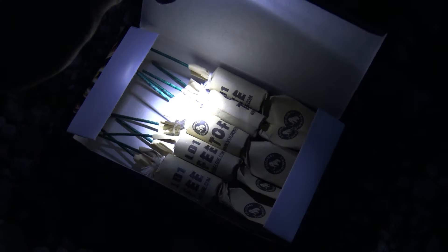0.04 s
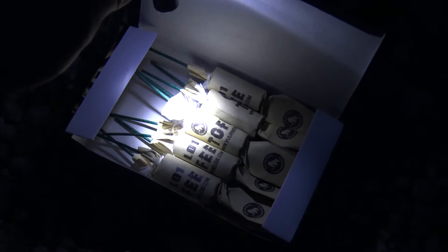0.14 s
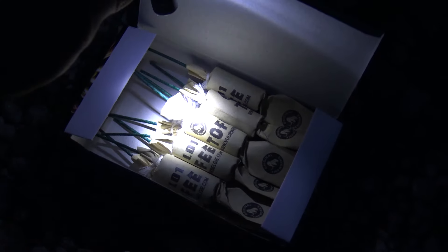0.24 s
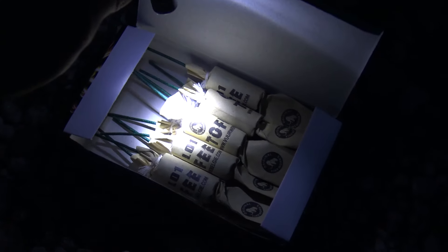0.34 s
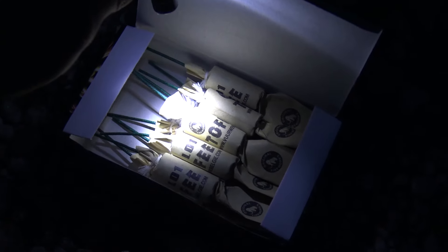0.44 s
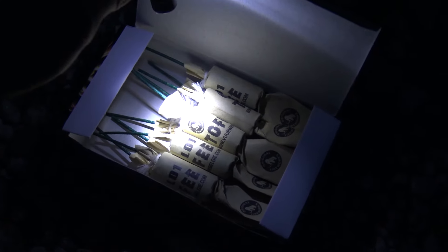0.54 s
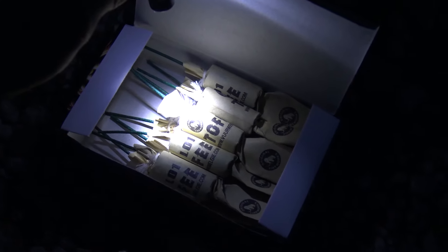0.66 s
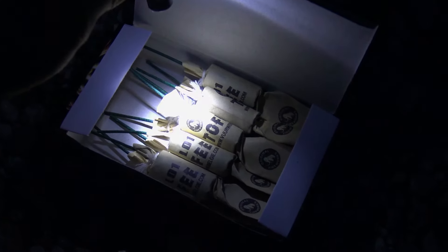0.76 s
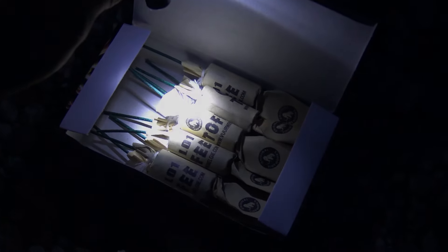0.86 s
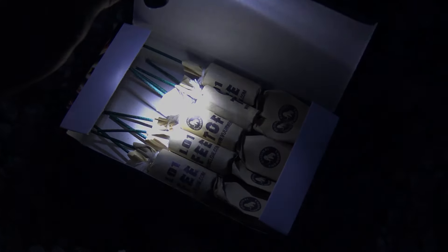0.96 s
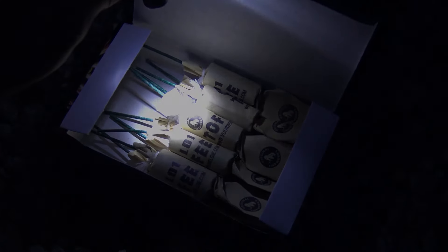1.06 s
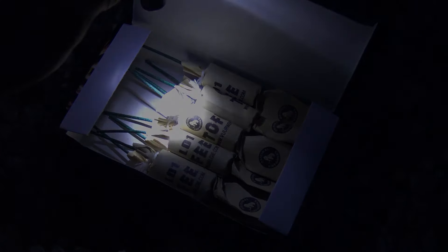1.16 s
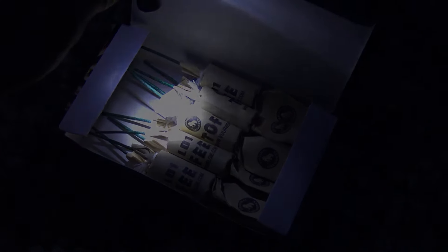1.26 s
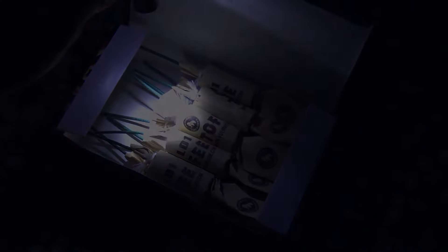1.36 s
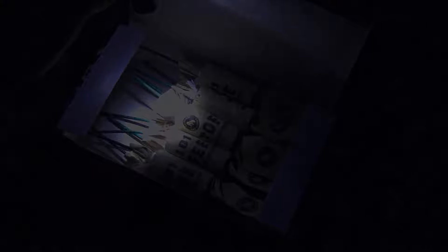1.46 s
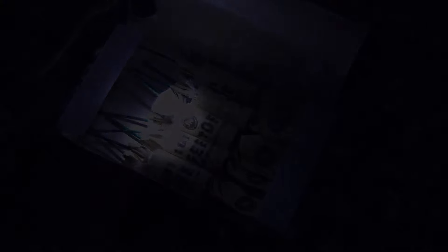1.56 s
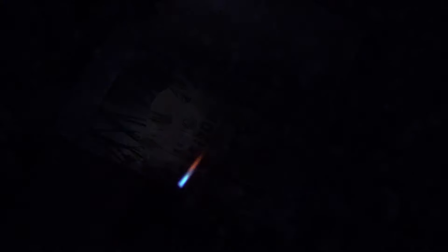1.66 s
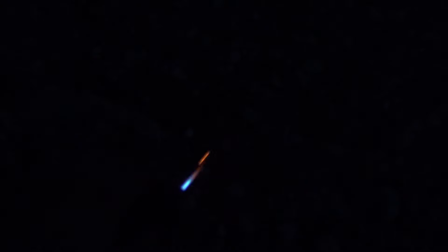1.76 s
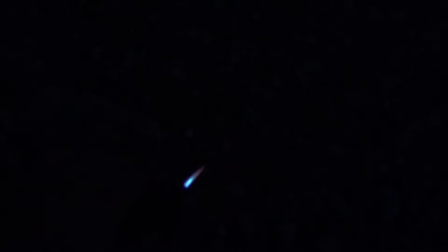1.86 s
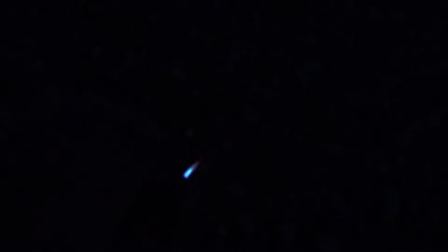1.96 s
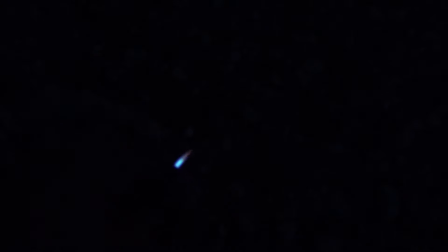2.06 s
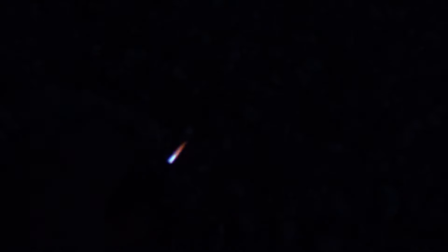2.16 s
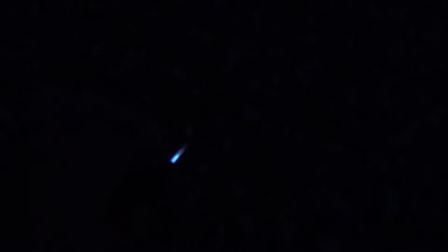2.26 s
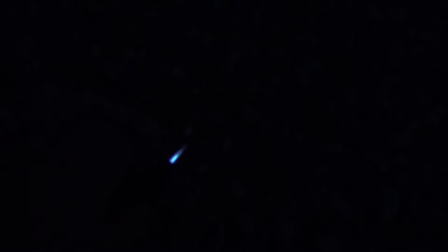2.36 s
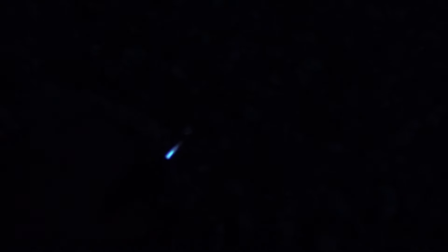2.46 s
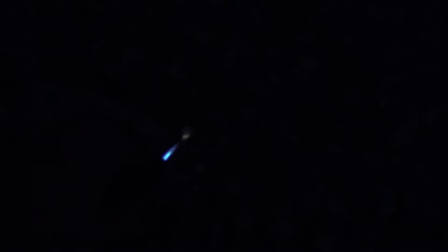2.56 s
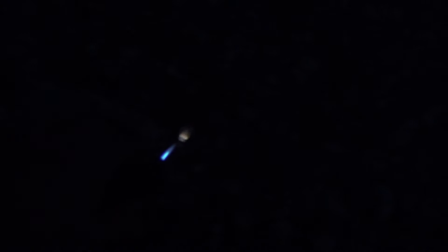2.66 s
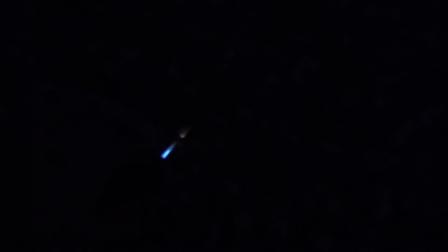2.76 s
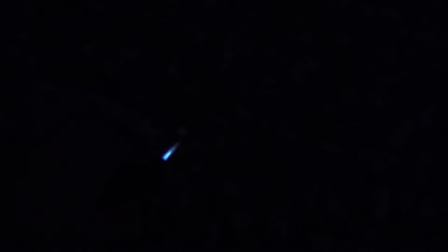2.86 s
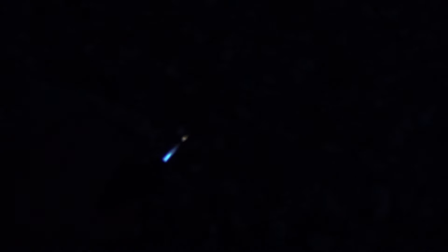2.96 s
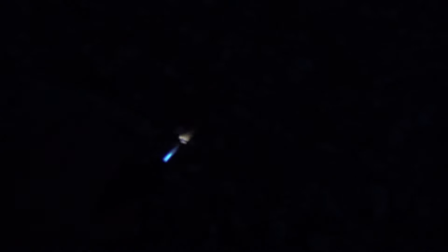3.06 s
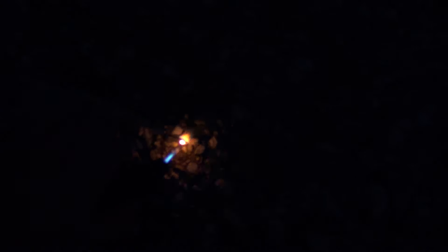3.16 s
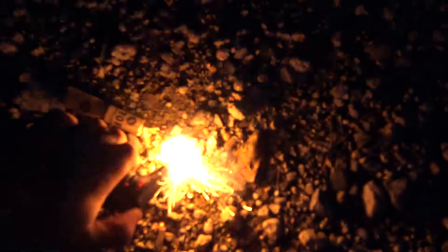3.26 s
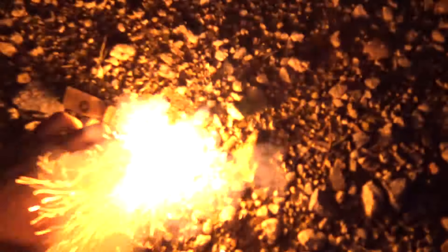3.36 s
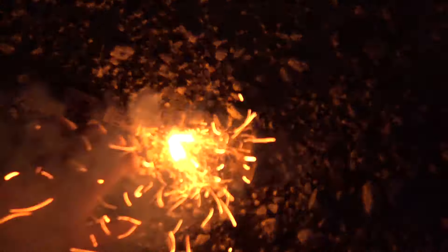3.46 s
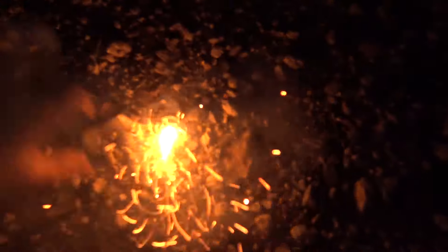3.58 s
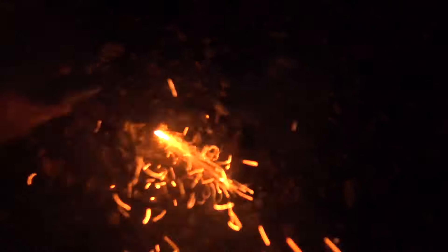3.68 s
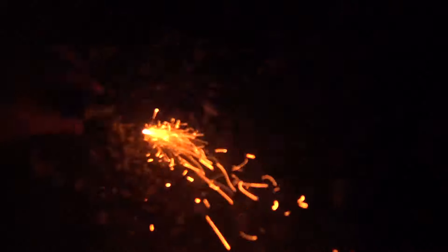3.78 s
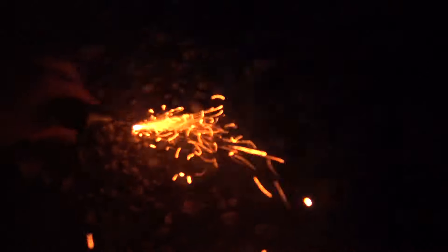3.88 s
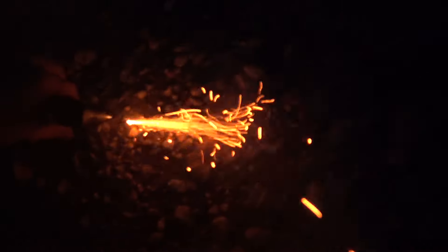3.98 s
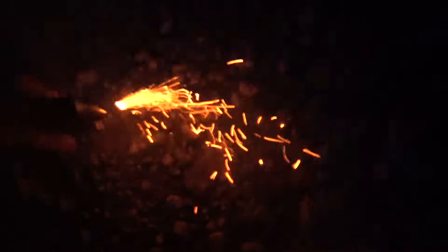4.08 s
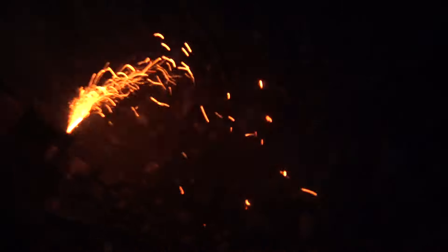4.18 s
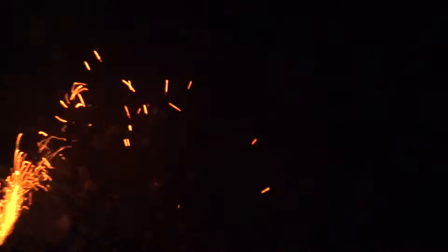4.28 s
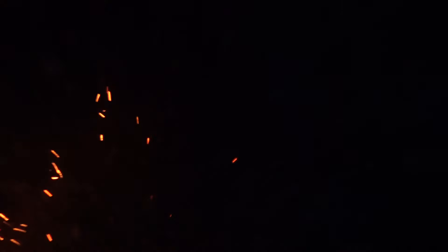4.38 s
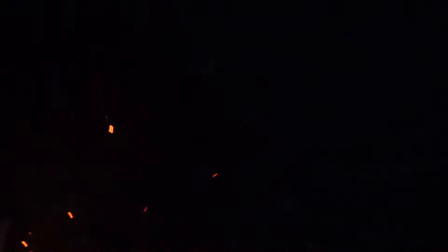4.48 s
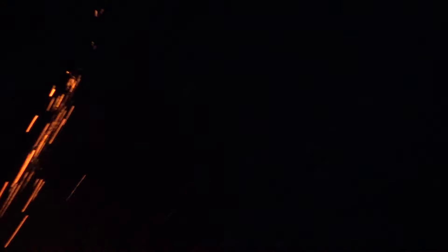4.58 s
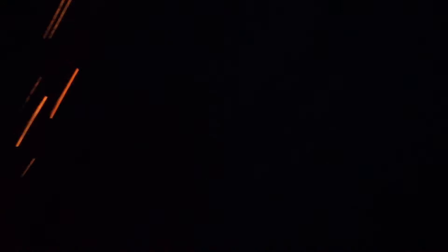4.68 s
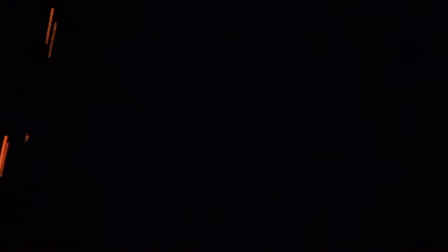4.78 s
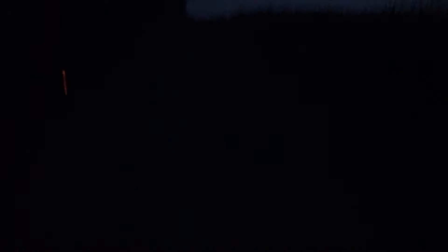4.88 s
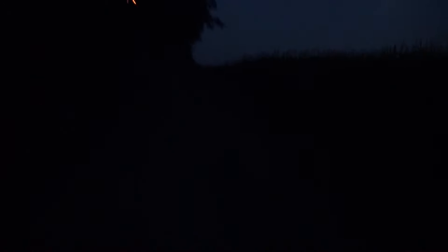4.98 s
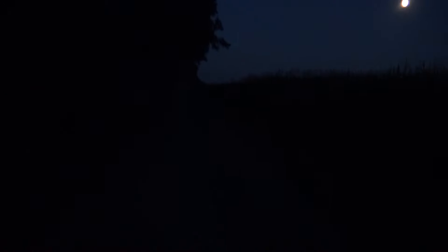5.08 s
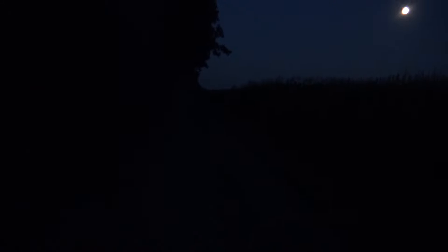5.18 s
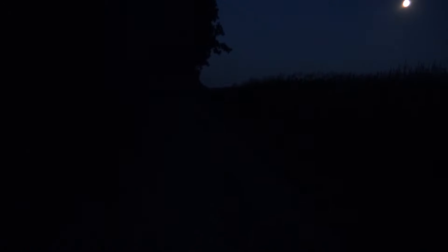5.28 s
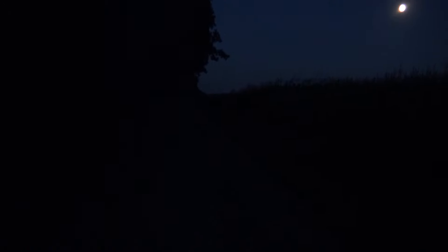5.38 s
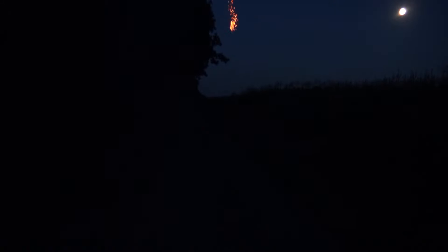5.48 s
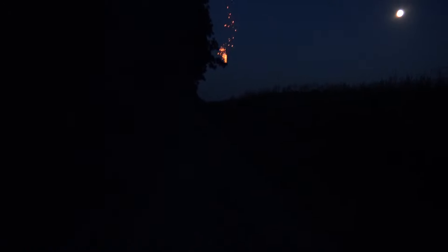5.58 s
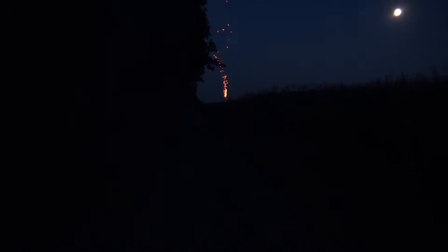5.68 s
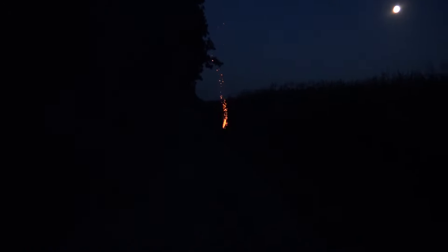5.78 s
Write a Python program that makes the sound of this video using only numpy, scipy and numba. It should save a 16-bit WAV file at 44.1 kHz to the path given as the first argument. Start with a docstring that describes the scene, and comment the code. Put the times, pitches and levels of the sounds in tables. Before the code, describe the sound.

Faint crickets outdoors, a sharp lighter click and soft gas flame, then a small rocket fizzes, pops and flies off with a sweeping hiss.

```python
"""A bush-cricket chirps in the night over a low, fading rush, its wings rasping tooth by tooth.
Fingers tick on a jet lighter, its hammer snaps, and the gas flame hisses against a firework's fuse.
The powder catches with a roar, sharpens to a sizzle and lifts off; its echo off the gravel arrives
ever later and sweeps down through the hiss. Sparks pop, shoes shift the stones, gusts hit the mics."""
import sys
import numpy as np
from scipy import signal
from scipy.fft import rfft, irfft, next_fast_len
from scipy.io import wavfile
from scipy.ndimage import uniform_filter1d, map_coordinates
from numba import njit

SR = 44100
rng = np.random.default_rng(int(sys.argv[2]) if len(sys.argv) > 2 else 0)


def store_wav(level_fs):
    """Save 16-bit WAV to argv[1]."""
    pcm = np.round(np.clip(np.atleast_2d(level_fs), -1, 1) * 32767)
    wavfile.write(sys.argv[1], SR, pcm.T.astype(np.int16))


N = 257539
T = np.arange(N) / SR

# Tone of the night air, the low rush and the wind on the mics: freq_hz, gain_db
AIR_EQ = [(25, 4), (45, 1.5), (80, -17.5), (200, -16.5), (600, -18), (1250, -11), (2200, -29), (4000, -45),
          (8000, -49.5), (16500, -37)]
RUSH_EQ = [(30, -29), (60, -1), (110, -3), (160, -4), (250, 1), (400, -7.5), (480, -9.5), (650, -15),
           (1150, -12), (1800, -22), (3000, -35), (6000, -42)]
WIND_EQ = [(20, -1), (38, 5.5), (60, -5), (100, -17), (160, -25.5), (400, -52)]
# Tone of the stones' stereo scatter and of the bounce off rough ground: freq_hz, gain_db
SCATTER_EQ = [(100, -16), (1300, -18), (2500, -10), (5000, -6), (8500, -4), (9800, -17), (16000, -28.5)]
GRAVEL_EQ = [(1500, 1.5), (5000, 0), (12000, -6.5), (16000, -14)]
# Gusts: centre_s, level_db, half_width_s
GUSTS = [(4.59, -34.5, .04), (4.65, -44, .18), (4.692, -31.5, .028), (5.19, -41.5, 0.14)]

# Resonance of the cricket's wing: freq_hz, gain_db
WING_EQ = [(6500, -38), (7900, -26), (8500, -12.5), (8850, -4), (9050, -4), (9330, 3.5), (9700, -1.5),
           (10100, -4.5), (10900, -11), (12500, -13.5), (13800, -25), (16500, -38)]
# Wing strokes within one chirp: offset_s, length_s, gain_db
WING_STROKES = [(0, 0.036, -3.5), (0.031, 0.05, -2.5), (0.073, 0.036, -10)]
# Bouts of chirping: start_s, end_s, period_s, gain_db, final_drop_db
CHIRP_BOUTS = [(.017, 1.33, .138, -45.5, 11), (1.376, 1.71, .133, -48.5, 11), (1.91, 2.25, .133, -46.3, 0),
               (2.378, 3.28, .139, -46.3, 0)]
# Stones knocked by a shoe: start_s, knock_db, pitch_hz, grit_db
STONE_KNOCKS = [(4.7748, -19, 1420, -30.5), (5.073, -35, 1030, -35.5), (5.158, -28, 1220, -30.5),
                (5.203, -34, 1570, -37), (5.315, -37, 647, -39.5), (5.346, -45, 700, -43),
                (5.363, -38, 600, -39.5), (5.657, -43, 785, -35.5), (5.69, -38, 1180, -34.5),
                (5.729, -37, 895, -39), (5.7976, -23.5, 1440, -38), (5.8021, -30, 1200, -42),
                (5.814, -36, 820, -31)]

# Finger ticks on the lighter: start_s, knock_db, scrape_db, scrape_hz
FINGER_TICKS = [(1.1451, -35.5, -47, 4200), (1.273, -42, -45.5, 4600), (1.4026, -37.5, -44, 2480),
                (1.536, -44, -48.5, 4000), (1.549, -41.5, -51, 4000)]
# The igniter's hammer striking and chattering: start_s, gain_db
HAMMER_HITS = [(1.6718, -9), (1.6724, -21), (1.671, -18)]
# Ring of the lighter's body: pitch_hz, gain_db, t60_s
LIGHTER_MODES = [(1850, -29, .015), (2320, -2.5, 0.018), (3520, -7, 0.033), (4150, -4, 0.021),
                 (5800, 1, 0.018), (6600, 4, 0.018), (6800, -4, 0.018), (7920, 12, 0.011),
                 (8060, 1, 0.0136), (8900, -11, 0.018), (10000, 0, 0.026), (10500, 5, 0.011),
                 (12850, -16, 0.017)]
# Tone of the opening rub, the slide before the snap and the snap's tail: freq_hz, gain_db
RUB_EQ = [(3000, -16), (5100, -3), (6000, -5), (9000, -18)]
SLIDE_EQ = [(4000, -14), (7000, 1), (9000, -2), (16000, -9)]
TAIL_EQ = [(1000, -6.5), (2300, -10), (3500, -16), (5500, -11), (7000, -12), (9000, -13), (12000, -10)]
# Tone of the flame's roar and of its gas hiss, free and against the fuse: freq_hz, gain_db
FLAME_EQ = [(80, -13), (250, -8), (600, -2), (850, -2), (1200, 0.5), (1550, -5), (2100, -18.5), (3200, -30),
            (6000, -50)]
FREE_GAS_EQ = [(1200, -22), (2200, -5), (2900, 1.5), (4800, -0.5), (5600, -3.5), (7000, -4.5),
               (12000, -0.5), (14000, 0.5), (16000, -6)]
FUSE_GAS_EQ = [(1200, 4), (2600, 6), (3350, -10), (3800, 4.5), (4300, -1), (5000, -2.5), (5600, 0.5),
               (6700, 3.5), (7700, -1), (12000, 0), (14000, -8.5), (16000, -2)]

# Bursting sparks: start_s, snap_db, thump_db, spit_db
SPARK_POPS = [(3.238, -42, -60, -40), (3.244, -43, -60, -37), (3.26, -35, -55, -40),
              (3.543, -13, -10.5, -27), (3.775, -23, -25, -21), (5.4429, -10.5, -31, -37),
              (5.529, -31, -50, -48)]
# Ring of a spark's snap: pitch_hz, gain_db, t60_s
SNAP_MODES = [(5600, -2.5, 0.0017), (7400, -1, 0.003), (10700, -8, .0028)]
# Thin tone of the sparks: freq_hz, gain_db
SPARK_EQ = [(300, -10), (1500, -20), (2200, -2.5), (16000, 2)]
# The four layers of burning powder, dark to bright: freq_hz, gain_db
ROAR_EQ = [(50, -25), (110, -13), (250, -5), (450, -2), (900, 0.5), (1180, 4.5), (1600, -2.5), (2200, -10),
           (3500, -26)]
HISS_EQ = [(1000, -20), (1750, -3), (2150, 1), (2900, -0.5), (3450, 0), (4070, 2), (4600, 3), (5350, 4),
           (5850, 2.5), (6350, 4), (7000, -1.5), (9000, -27)]
SIZZLE_EQ = [(4500, -38), (6200, -10.5), (7000, -4), (8500, 0.5), (9000, -2), (9600, 0), (10400, -2.5),
             (11200, -3.5), (12300, -10), (15000, -33)]
SPRAY_EQ = [(9000, -34), (10800, -13), (11700, -0.5), (13000, 2), (14300, -2), (15300, -4), (16500, -9)]
# The firework's burn: time_s, gain_db, thrust (about 0 for a smouldering fuse, 1 for the full jet)
BURN_CURVE = [(3.23, -57, 0.17), (3.3, -38, 0.32), (3.35, -31.5, 0.16), (3.44, -27.8, -0.13),
              (3.55, -34, .05), (3.65, -28.5, 0.097), (3.71, -32, 0.12), (3.79, -31.5, 0.79),
              (3.93, -31, 1.02), (4.0, -29, 0.77), (4.06, -31.5, 0.78), (4.13, -31, 0.99),
              (4.31, -34.5, 0.49), (4.42, -36, 0.64), (4.55, -41, 0.64), (4.68, -33.5, 0.67),
              (4.8, -42.5, 0.64), (4.91, -43.5, 0.78), (5.04, -48.5, 0.53), (5.2, -48.5, .75),
              (5.84, -51.5, 0.57)]
# Its flight: time_s, ground_echo_ms, pan_db (left minus right)
FLIGHT_PATH = [(3.2, 0.1, .5), (3.85, .11, 2.7), (4.068, 0.078, 2.5), (4.185, .43, 2.5), (4.28, 0.588, 3.5),
               (4.39, 0.71, 4.5), (4.5, 1.11, 4.4), (4.6, 1.9, 3.8), (4.75, 3.5, 2.5), (5.84, 7, 0.1)]
# The band in which the mic pair shows direction: freq_hz, gain_db
DIRECTION_EQ = [(8500, 0), (9400, -11), (10500, -33)]
# Reflections off the hand and stones near the jet: lag_ms, gain
NEAR_ECHOES = [(.48, 0.17), (.7, 0.067), (1.42, .12)]

LIFT_S, LIFT_TAKES_S = 4, 0.2


def undb(db):
    """Decibels to gain."""
    return 10 ** (np.asarray(db) / 20)


def level(x, db=0):
    """Scale to an rms level."""
    return x * undb(db) / np.sqrt(np.mean(x ** 2))


def curves(table):
    """A table's columns as automation lanes, joined by straight lines in time."""
    times, *columns = np.transpose(table)
    return [np.interp(T, np.sort(times), column) for column in columns]


def ramp(start, length):
    """A straight rise from 0 to 1."""
    return np.clip((T - start) / length, 0, 1)


def during(start, end, fade):
    """A gate with sloping edges."""
    return ramp(start, fade) * np.clip((end - T) / fade, 0, 1)


def cue(x, start_s):
    """Drop a short sound onto the timeline."""
    return np.pad(x, (int(start_s * SR), N))[:N]


def colour(x, eq):
    """Filter by an EQ curve of (freq_hz, gain_db) points."""
    hz, db = np.transpose(eq)
    size = next_fast_len(N + SR // 10, True)
    bins_hz = np.maximum(np.fft.rfftfreq(size, 1 / SR), 1)
    gain = undb(np.interp(np.log(bins_hz), np.log(hz), db))
    return irfft(rfft(x, size) * gain, size)[:N]


def noise():
    """White noise."""
    return rng.standard_normal(N)


def walk(rate_hz):
    """Smooth random modulation with a spread near 1."""
    hold = max(int(SR / rate_hz), 1)
    steps = np.repeat(noise()[:N // hold + 1], hold)
    return uniform_filter1d(steps, hold)[:N] * np.sqrt(3 / 2)


def crackle(per_s, spread_db):
    """Random tiny clicks of uneven size."""
    size = undb(spread_db * np.minimum(rng.exponential(size=N), 6))
    return level((rng.random(N) < per_s / SR) * size * np.sign(noise()))


@njit
def resonate(x, hz, width_hz):
    """Band-pass with a moving centre, gain 1 at the peak."""
    out, band_state, low_state = np.empty(len(x)), 0., 0.
    for i in range(len(x)):
        tuning, damping = np.tan(np.pi * hz[i] / SR), width_hz / hz[i]
        band = (band_state + tuning * (x[i] - low_state)) / (1 + tuning * (tuning + damping))
        band_state, low_state = 2 * band - band_state, low_state + 2 * tuning * band
        out[i] = damping * band
    return out


def delay(x, ms):
    """Read a sound at a moving lag."""
    return map_coordinates(x, [(T - ms / 1000) * SR], order=3)


def burst(start_s, db, hz, t60, ratio):
    """A dying crack of noise, in a band from hz / ratio to hz * ratio."""
    age = T[:SR // 4]
    edges_hz = [hz / ratio, min(hz * ratio, SR / 2 - 1000)]
    band = signal.butter(2, edges_hz, "band", fs=SR, output="sos")
    crack = signal.sosfilt(band, rng.standard_normal(len(age)) * undb(-60 * age / t60))
    return cue(crack * undb(db) / np.abs(crack).max(), start_s)


def knock(start_s, db, hz, t60):
    """One fast-dying resonance."""
    age = T[:SR // 10]
    ring = np.sin(2 * np.pi * hz * age) * undb(-60 * age / t60)
    return cue(ring * undb(db) / np.abs(ring).max(), start_s)


def place(x, pan_db, scatter_db):
    """Pan between two mics (positive is left); stones scatter the sound differently to each."""
    echoes = rng.standard_normal(SR // 100)
    scattered = signal.fftconvolve(x, echoes / np.linalg.norm(echoes))[:N]
    side = undb(scatter_db) * colour(scattered, SCATTER_EQ)
    return np.array([(x + side) * undb(pan_db / 2), (x - side) * undb(-pan_db / 2)])


def night_air():
    """The bed: faint air, and a low rush with a slight hum that holds, then dies away early."""
    hold_s, fall_db_per_s, hum_hz = 0.85, 11.5, 485.0
    air = level(colour(noise(), AIR_EQ), -54.5) * undb(1.1 * walk(3.42))
    hum = level(resonate(noise(), np.full(N, hum_hz), width_hz=14.0), -16.5)
    rush = level(colour(noise(), RUSH_EQ)) + hum
    rush_db = -45.5 - fall_db_per_s * np.maximum(T - hold_s, 0) + 0.69 * walk(14.1)
    rush *= undb(rush_db) * during(-1, 1.75, fade=0.21)
    return place(air, pan_db=6, scatter_db=14.5) + place(rush, pan_db=2, scatter_db=6.5)


def wind():
    """Gusts swell and flutter; air tumbles over each mic separately, mostly the left."""
    swell = sum(undb(db) * np.exp(-((T - s) / width) ** 2) for s, db, width in GUSTS)
    flutter = undb(1.2 * walk(21.9))
    return np.array([level(colour(noise(), WIND_EQ), db) * swell * flutter for db in (3.3, -2.6)])


def crickets():
    """Each stroke drags a row of teeth over a resonant wing; more insects blur together far off."""
    envelope = np.zeros(N)
    for start, end, period, bout_db, drop_db in CHIRP_BOUTS:
        times = np.arange(start, end, period)
        fading = np.linspace(0, 1, len(times)) ** 3.8  # any drop in level comes late in a bout
        for s, db in zip(times, bout_db - drop_db * fading):
            for offset, length, stroke_db in WING_STROKES:
                arch = np.sin(np.linspace(0, np.pi, int(length * SR)))
                envelope += undb(db + stroke_db) * cue(np.abs(arch) ** 0.5, s + offset)
    teeth = crackle(per_s=3500, spread_db=-2.5)
    near = envelope * level(colour(teeth, WING_EQ), -3.5)
    far = level(colour(noise(), WING_EQ), -64) * undb(1.3 * walk(6))
    return place(near, pan_db=6.5, scatter_db=4) + place(far, pan_db=4.5, scatter_db=4)


def shoes():
    """Stones knock under a shifting foot; grit crunches over the dull scuff of the sole."""
    ring_cycles = 8
    steps = np.zeros(N)
    for s, db, hz, grit_db in STONE_KNOCKS:
        stone = knock(s, db, hz, t60=ring_cycles / hz)
        edge = burst(s, db - 10, hz=1.64 * hz, t60=0.0034, ratio=1.27)
        grit = burst(s, grit_db, hz, t60=0.049, ratio=1.6)
        sole = burst(s, grit_db - 10.5, hz=430, t60=0.058, ratio=1.43)
        steps += stone + edge + grit + sole
    return place(steps, pan_db=1.5, scatter_db=1.5)


def fingers():
    """Fingers rub, tick and slide on the lighter before it fires."""
    rub = level(colour(noise(), RUB_EQ), -69) * during(0, 0.27, fade=0.05)
    ticks = np.zeros(N)
    for s, db, scrape_db, scrape_hz in FINGER_TICKS:
        ticks += knock(s, db, hz=1652, t60=0.01) + burst(s, scrape_db, scrape_hz, t60=0.013, ratio=1.47)
    slide = level(colour(noise(), SLIDE_EQ), -54) * during(1.615, 1.675, fade=0.019)
    return place(rub + ticks + slide, pan_db=2.5, scatter_db=-4)


def igniter():
    """A sprung hammer snaps and rings the lighter's body; the surroundings throw back a short tail."""
    age = T[:SR // 4]
    ring = sum(undb(db - 60 * age / t60) * np.sin(2 * np.pi * (hz * age + rng.random()))
               for hz, db, t60 in LIGHTER_MODES)
    ring /= np.abs(ring).max()
    snap = sum(cue(ring * undb(db - 5), s) + burst(s, db, hz=8550, t60=0.0061, ratio=1.31)
               for s, db in HAMMER_HITS)
    snap += burst(HAMMER_HITS[0][0], db=-25, hz=1200, t60=0.024, ratio=11)
    snap += knock(1.6745, db=-22, hz=3520, t60=0.018)
    reverb = level(rng.standard_normal(len(age)) * np.exp(-age / 0.038)) / np.sqrt(len(age))
    tail = colour(signal.fftconvolve(snap, reverb)[:N], TAIL_EQ)
    return place(snap, pan_db=2.5, scatter_db=-4) + place(tail, pan_db=-0.23, scatter_db=2)


def flame():
    """The lighter's jet flame roars softly; its gas hiss turns hollow once it plays on the fuse."""
    lit_s, contact_s = 1.68, 2.407
    age = np.maximum(T - lit_s, 0)
    roar = level(colour(noise(), FLAME_EQ), -48.5) * undb(0.76 * walk(29.77))
    free = level(colour(noise(), FREE_GAS_EQ))
    # the nozzle's resonance rises and weakens as it warms
    nozzle = resonate(free, hz=3180 + 1950 * age, width_hz=1600.0) * undb(7 - 8 * age)
    on_fuse = level(colour(noise(), FUSE_GAS_EQ), 2.6)
    contact = ramp(contact_s - 0.055, 0.11)
    gas = np.sqrt(1 - contact) * (free + nozzle) * undb(-2.5) + np.sqrt(contact) * on_fuse
    gas *= undb(-57 - 2.5 * age)  # the hiss sinks as the pressure drops
    return place((roar + gas) * during(lit_s, 3.4, fade=0.057), pan_db=0.7, scatter_db=-5.5)


def sparks():
    """Lumps of powder, too small to radiate bass, burst with a dry snap, a small thump and a spit."""
    pops = np.zeros(N)
    for s, snap_db, thump_db, spit_db in SPARK_POPS:
        pops += sum(knock(s, snap_db + db, hz, t60) for hz, db, t60 in SNAP_MODES)
        pops += knock(s, thump_db, hz=2280, t60=0.0058)
        pops += burst(s, spit_db, hz=7000, t60=0.019, ratio=2.4)
    return place(colour(pops, SPARK_EQ), pan_db=2, scatter_db=-6)


def powder(eq, grain_db, flicker_db):
    """Burning powder: rushing gas, countless bursting grains and rarer spits, in an uneven flow."""
    gas = noise()
    grains = crackle(per_s=3500, spread_db=2.5)
    spits = 0.32 * crackle(per_s=120, spread_db=2.5)
    return level(colour(gas + undb(grain_db) * (grains + spits), eq)) * undb(flicker_db * walk(70))


def jet():
    """The powder roars while the fuse burns, and sharpens to a sizzle as thrust builds."""
    burn_db, thrust = curves(BURN_CURVE)
    aloft_db = -1.7 * ramp(LIFT_S, LIFT_TAKES_S)  # aloft, the roar thins and the spray is beamed away
    roar = powder(ROAR_EQ, grain_db=-5.5, flicker_db=0.28) * undb(1 - 9 * thrust + aloft_db)
    hiss = powder(HISS_EQ, grain_db=-4.5, flicker_db=0.92) * undb(1.08)
    sizzle = powder(SIZZLE_EQ, grain_db=-1.5, flicker_db=1.4) * undb(-2.5 + 9.8 * thrust)
    spray = powder(SPRAY_EQ, grain_db=-13, flicker_db=1.7) * undb(-10 + 13 * thrust + aloft_db)
    # the jet resonates from the motor's start, climbing in pitch just before lift-off
    ring_mix = undb(1) * during(3.7, 4.09, fade=0.073)
    ring = resonate(sizzle + spray, hz=9800 + 3300 * ramp(3.91, 0.089), width_hz=3000.0)
    treble = (sizzle + spray + ring_mix * ring) / (1 + 0.5 * ring_mix)  # trim offsets the added ring
    envelope = undb(burn_db + 0.17 * walk(16)) * during(3.21, 7, fade=0.035)
    return (roar + hiss + treble) * envelope


def swirl(x, wander):
    """The flame whips about, so echoes from nearby things keep shifting until it lifts clear."""
    close = 1 - ramp(LIFT_S, LIFT_TAKES_S)
    return x + close * sum(gain * delay(x, ms * (1 + wander * walk(8.3))) for ms, gain in NEAR_ECHOES)


def firework():
    """The jet flanges against its own ground echo, whose lag grows as it climbs."""
    echo_resting, echo_aloft, echo_half_ms = 0.39, 0.72, 1.76
    mic_lag_ms_per_db = 0.01
    echo_ms, pan_db = curves(FLIGHT_PATH)
    direct = swirl(jet(), wander=0.13)
    # the ground comes into the clear at lift-off; its roughness weakens the echo at longer lags
    echo_gain = echo_resting + (echo_aloft - echo_resting) * ramp(LIFT_S, 0.09)
    echo_gain /= 1 + (echo_ms / echo_half_ms) ** 2
    # the echo comes from ever different stones, so its lag trembles
    echo = delay(colour(direct, GRAVEL_EQ), echo_ms * (1 + 0.035 * walk(45)))
    flanged = (direct + echo_gain * echo) / np.sqrt(1 + 0.57 * echo_gain ** 2)
    left, right = place(flanged, pan_db, scatter_db=-3.5)
    # below the high treble, the right mic lags more the further left the jet is
    directional = colour(right, DIRECTION_EQ)
    return np.array([left, right - directional + delay(directional, mic_lag_ms_per_db * pan_db)])


def scene():
    """The stereo mix, from the night bed up to the firework."""
    background = night_air() + wind() + crickets() + shoes()
    lighter = fingers() + igniter() + flame()
    return background + lighter + sparks() + firework()


def record(dry):
    """The phone cuts the deepest bass and the very top."""
    low_cut = signal.butter(2, 22, "high", fs=SR, output="sos")
    high_cut = signal.ellip(10, 0.2, 70, 16600, fs=SR, output="sos")
    return signal.sosfilt(high_cut, signal.sosfilt(low_cut, dry))


dry = scene()
out = record(dry)
store_wav(out)
```